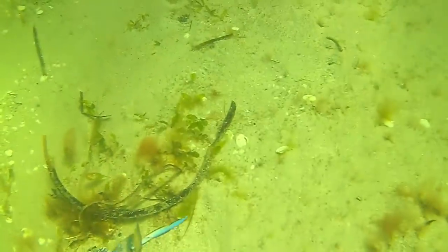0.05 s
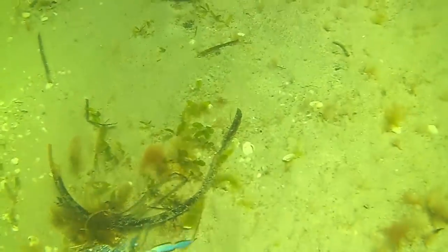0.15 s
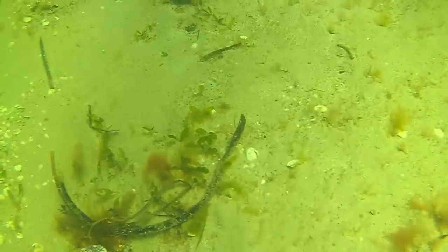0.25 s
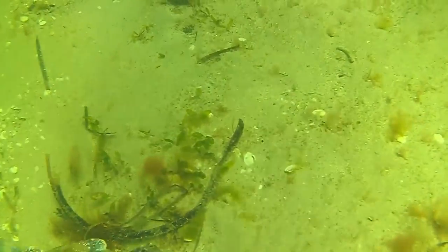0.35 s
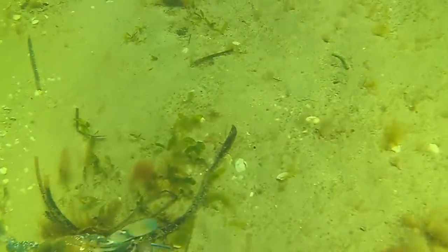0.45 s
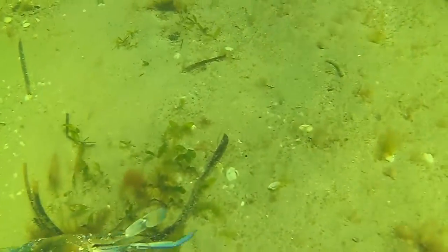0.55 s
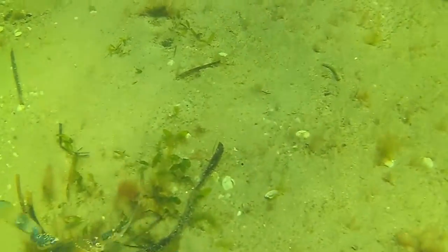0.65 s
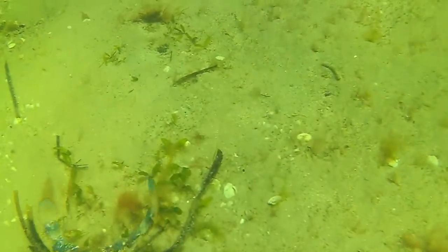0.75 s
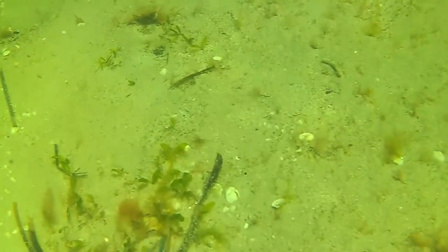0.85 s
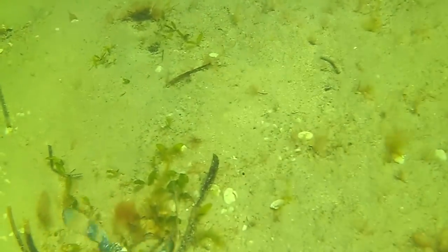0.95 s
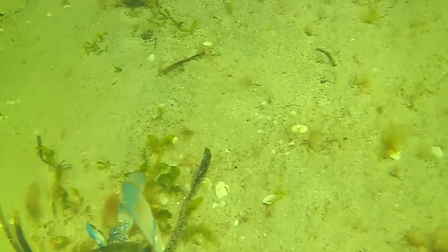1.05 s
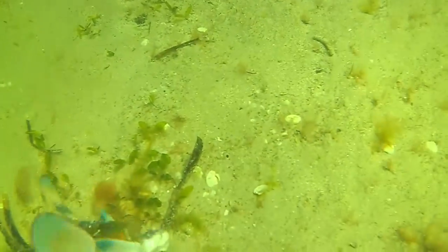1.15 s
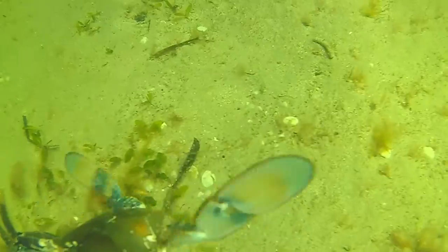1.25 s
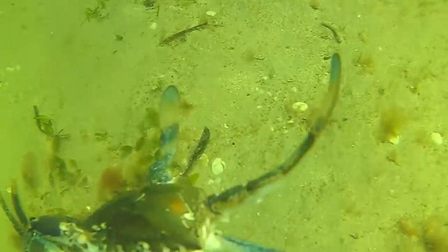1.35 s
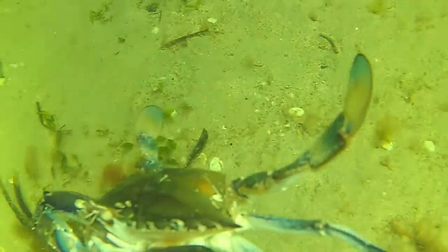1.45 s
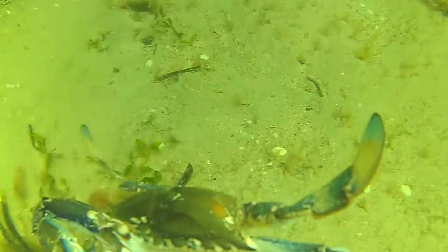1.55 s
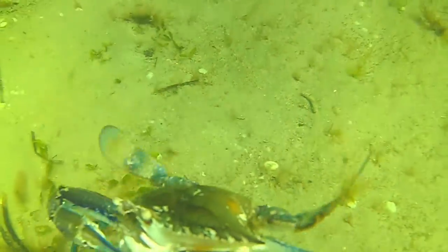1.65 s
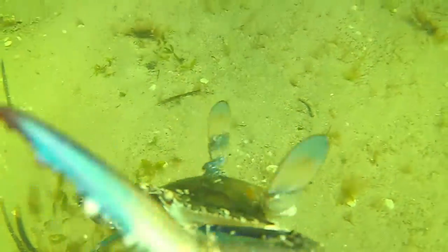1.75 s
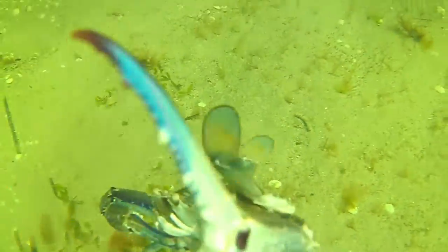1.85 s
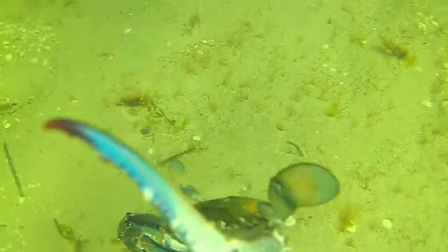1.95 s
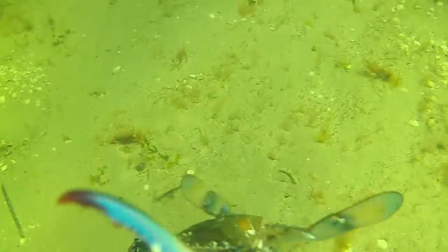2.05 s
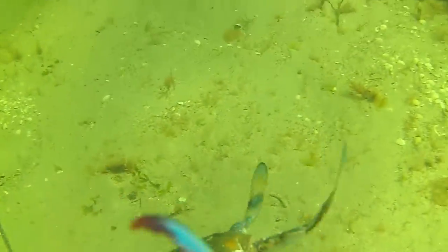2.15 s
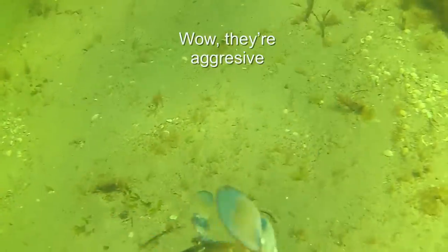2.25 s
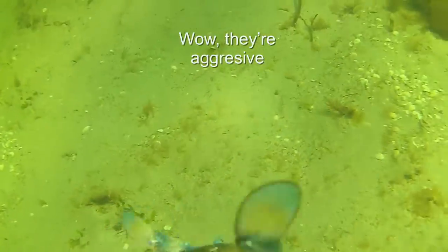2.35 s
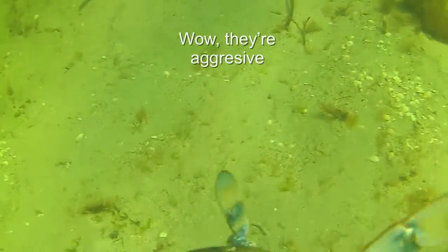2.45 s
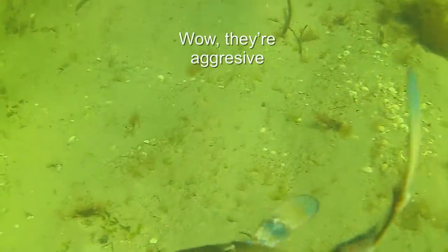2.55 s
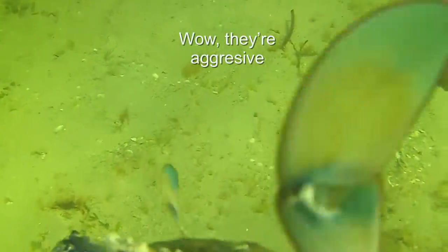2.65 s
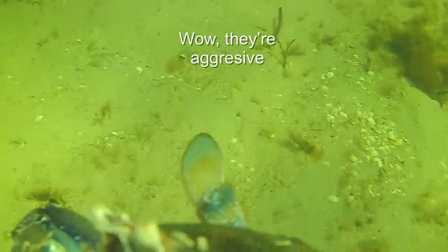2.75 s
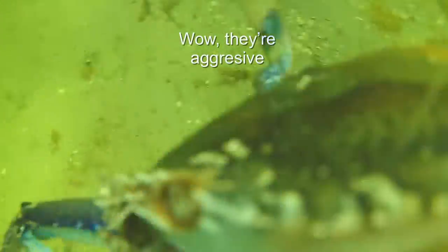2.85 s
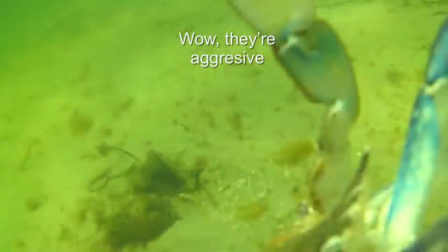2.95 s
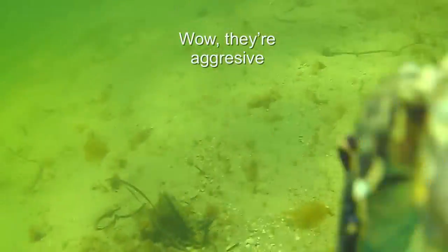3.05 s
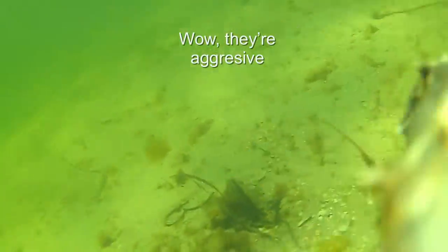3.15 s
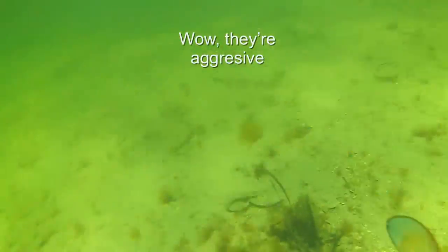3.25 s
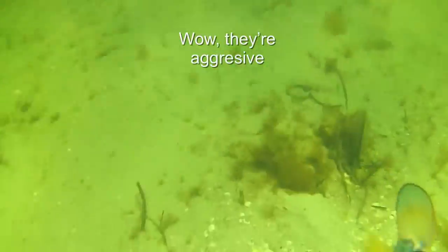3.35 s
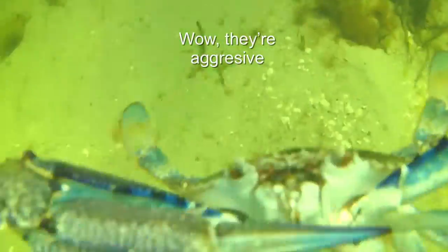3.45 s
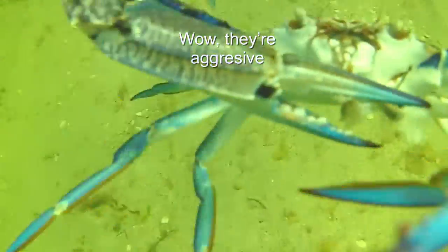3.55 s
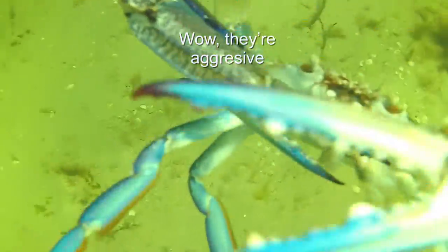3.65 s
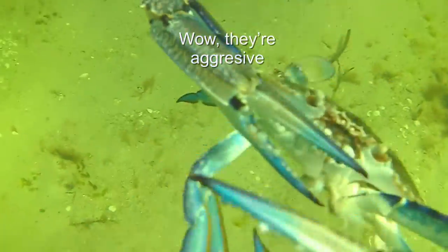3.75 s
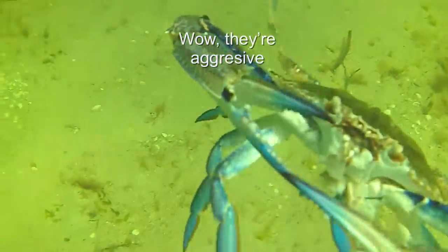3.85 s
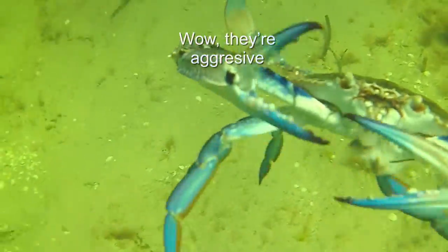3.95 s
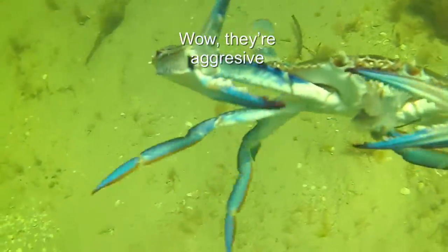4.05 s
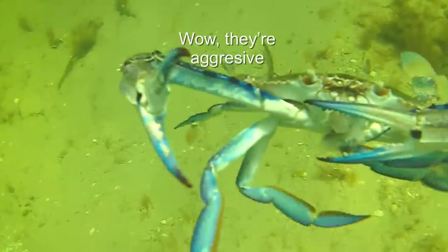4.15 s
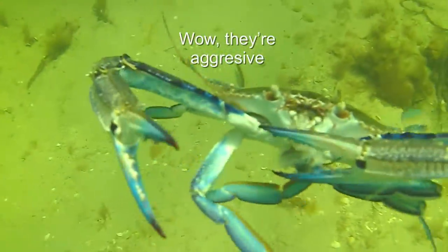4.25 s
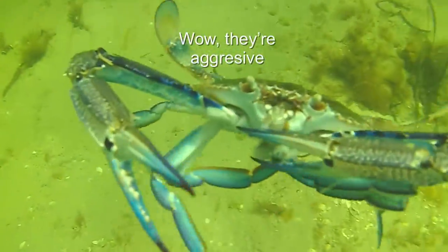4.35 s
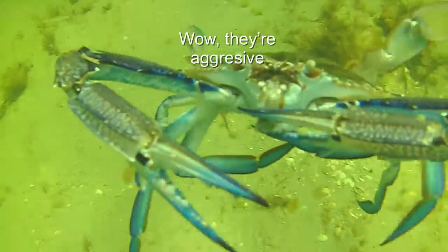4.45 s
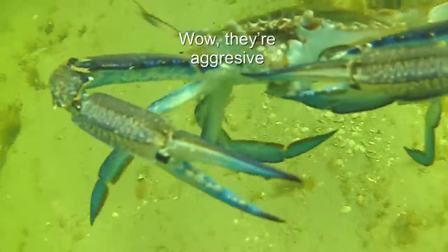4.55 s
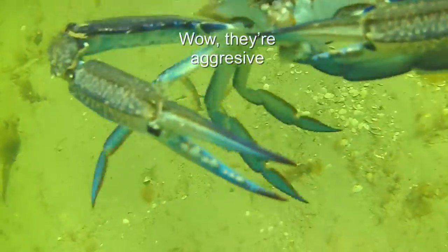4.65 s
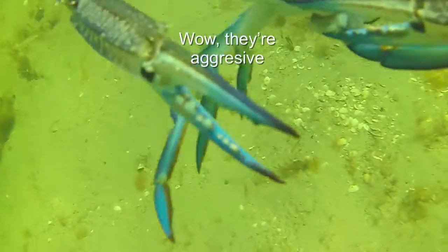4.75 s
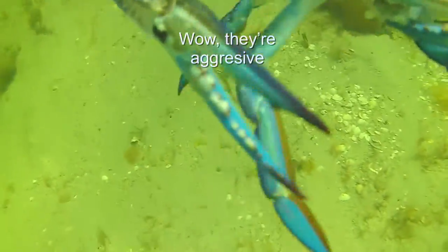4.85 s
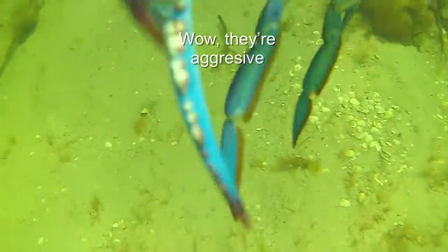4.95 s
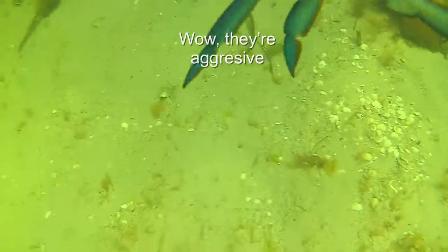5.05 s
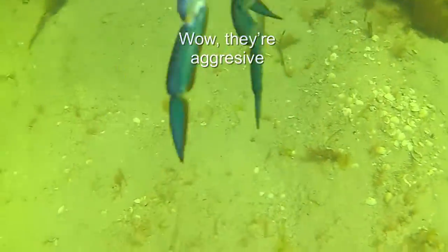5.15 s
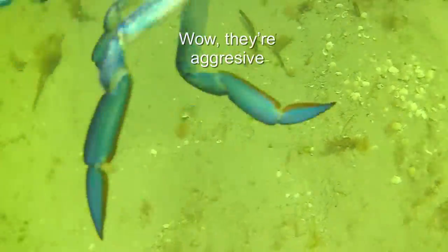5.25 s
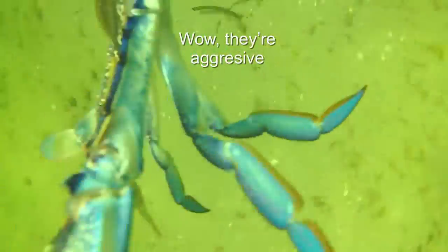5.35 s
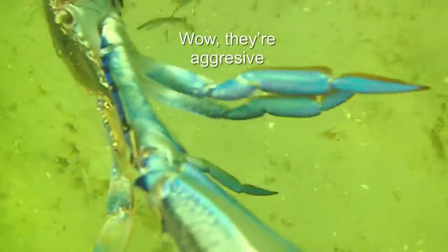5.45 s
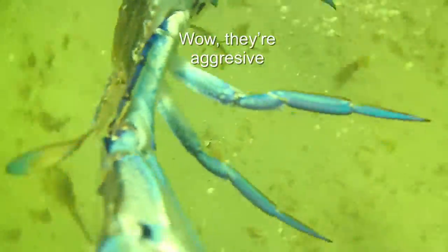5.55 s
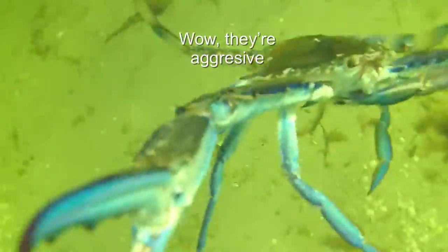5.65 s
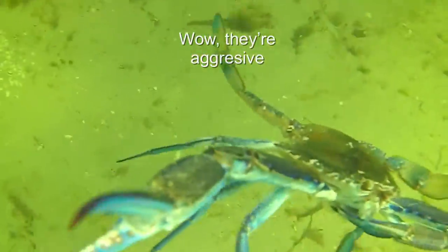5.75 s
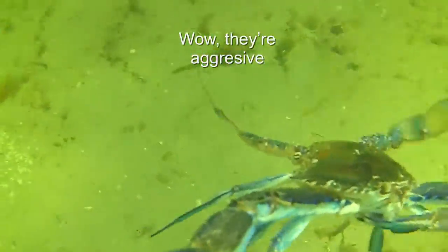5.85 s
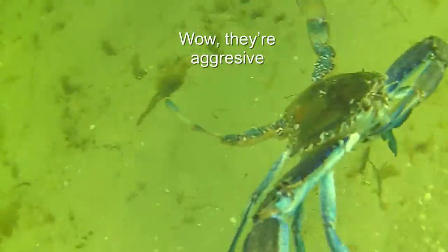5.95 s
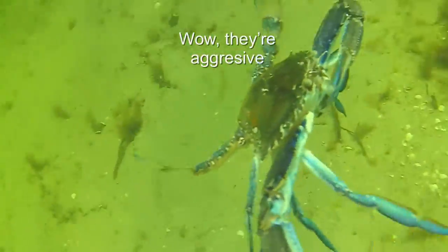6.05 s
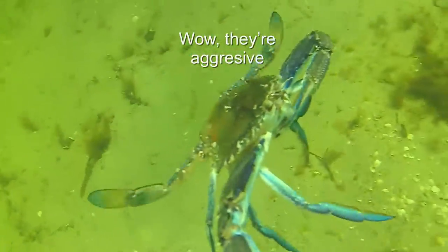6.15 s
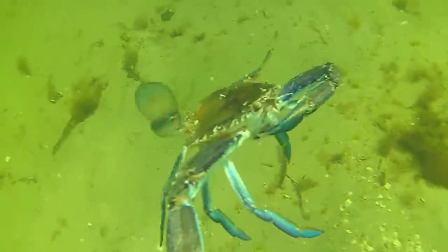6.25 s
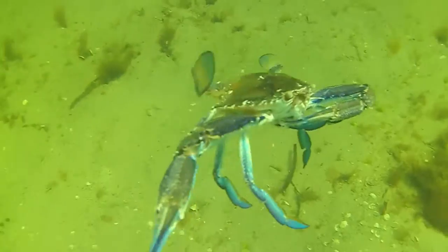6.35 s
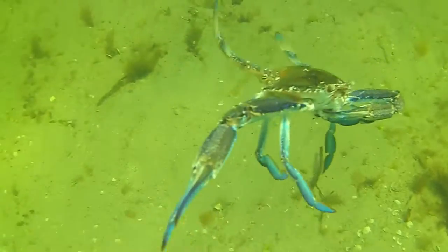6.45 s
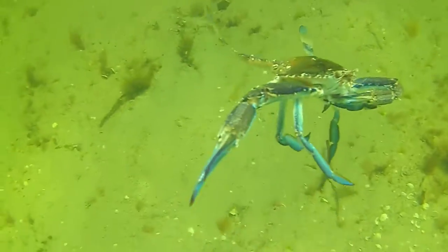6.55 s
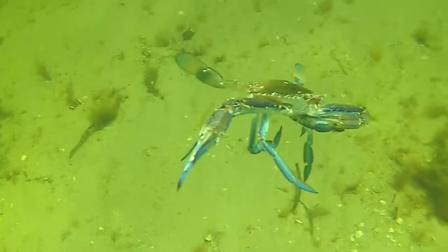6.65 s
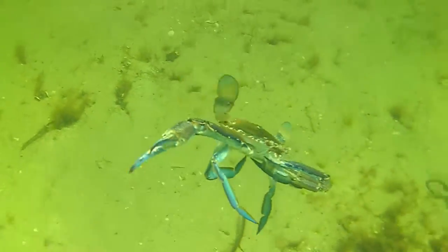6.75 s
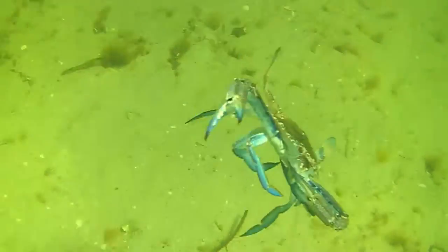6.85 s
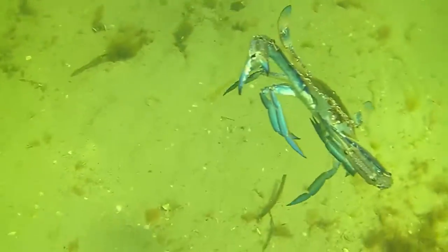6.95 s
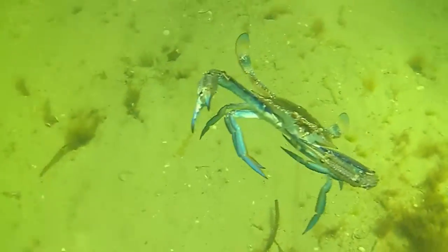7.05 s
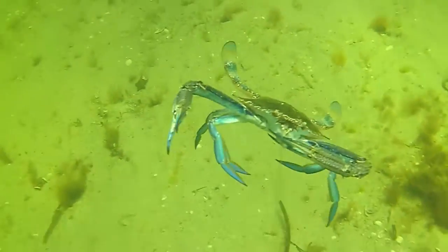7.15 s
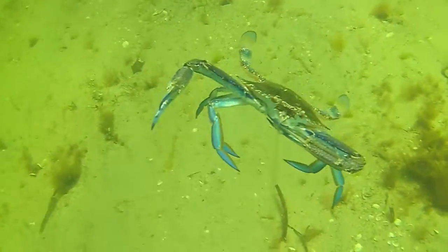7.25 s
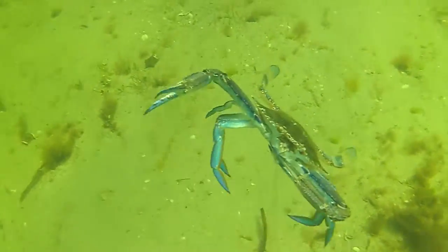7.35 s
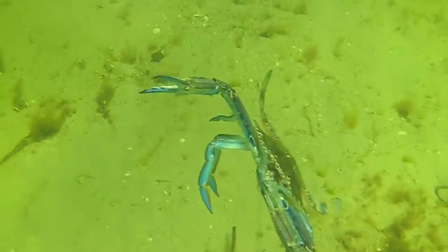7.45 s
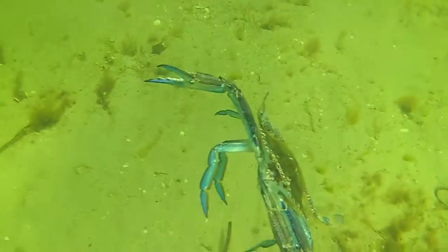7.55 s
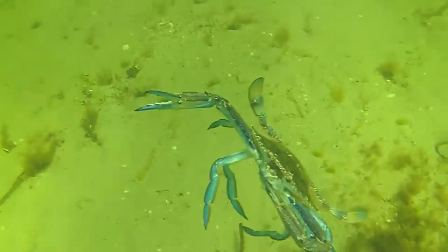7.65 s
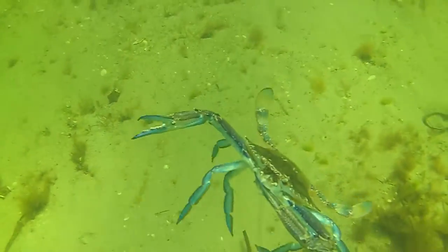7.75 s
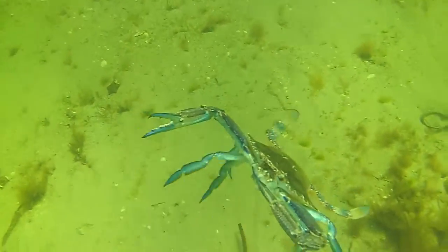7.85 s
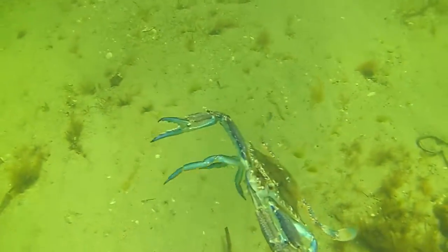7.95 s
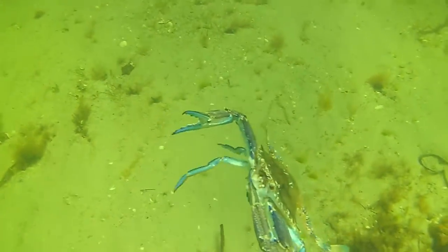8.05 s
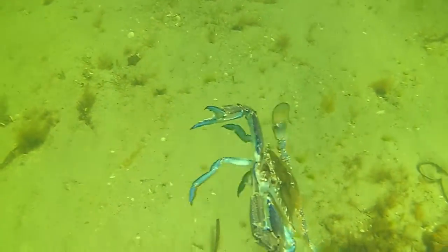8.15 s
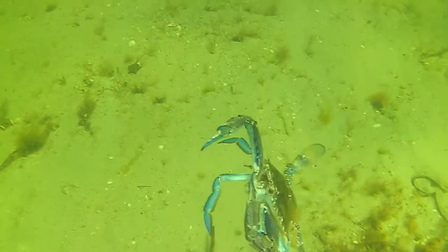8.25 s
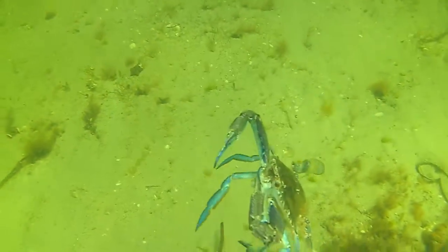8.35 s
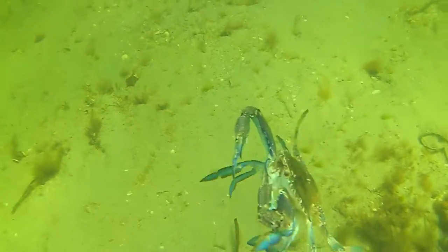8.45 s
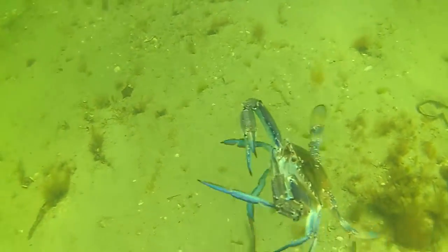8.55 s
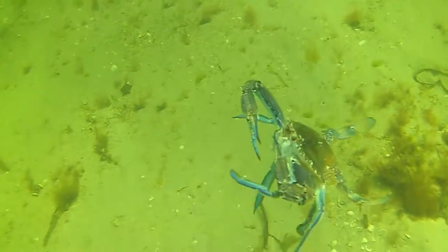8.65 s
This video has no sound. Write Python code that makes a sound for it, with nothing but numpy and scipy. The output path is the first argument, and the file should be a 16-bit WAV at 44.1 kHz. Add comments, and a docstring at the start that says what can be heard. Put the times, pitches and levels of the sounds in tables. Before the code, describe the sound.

A camera in a plastic housing sits just above the seabed, its microphone behind the wall. Steady faint hiss, a low hum and a barely audible thin whine lie under fine, distant shrimp crackle, with a brighter snap at about 0.8 seconds. At 1.1 a sharp claw tap lands, followed by small scratches and soft bumps. Light scraping starts near 2.65, then from 2.75 to 3.15 the crab attacks: very loud, hard knocks, rapid chattering and harsh grinding, with a deep thump as the case is rocked, overloading into crunchy distortion. Quiet returns abruptly. A smaller click comes at 3.5, a strong one at 5.1 with a dull judder, and another at 5.6 among faint scrapes. Light ticks follow around 6.5 to 6.9, a shrimp snap at 7.25, and a final loud tap at 7.8 before the crackle and hiss continue to the end.

```python
"""Distant shrimp crackle through the water over a camera's own hiss, hum and thin whine; then a crab attacks.
The small camera sits in a plastic housing just above the seabed, its microphone behind the housing wall.
Claws and legs tap, knock and scrape at no distance at all: clicks and stick-slip noise ring the shell's modes.
Shoves swing the housing on its mount, as decaying low tones; shrimp are clicks and noise through wall resonances.
The hardest knocks overload the recorder, which briefly lowers its gain and clips what is still too loud."""
import sys
import numpy as np
from scipy import signal
from scipy.fft import rfft, irfft
from scipy.io import wavfile
from scipy.ndimage import uniform_filter1d, minimum_filter1d

SR = 44100
rng = np.random.default_rng(int(sys.argv[2]) if len(sys.argv) > 2 else 0)


def wav_out(sig):
    """Save sig, one row per channel (or a flat mono array), as 16-bit PCM at SR to the path in sys.argv[1]."""
    wavfile.write(sys.argv[1], SR, np.round(np.clip(np.atleast_2d(sig).T, -1, 1) * 32767).astype(np.int16))


N = 383669  # length in samples

# amplifier hiss, relative spectrum: (frequency [Hz], density [dB per Hz])
HISS_SPECTRUM = [(12, -36), (25, -7.5), (65, -5.5), (200, -9), (530, -16.5), (1400, -23.5), (4000, -27),
                 (9000, -30.5), (16400, -41)]
HISS_RMS_DB = -61.5
# partials of the hum: (multiple of HUM_HZ, relative level [dB])
HUM_PARTIALS = [(1, -1), (2, -5), (3, -10), (5, -22), (7, -14.5), (8, -14.5)]
HUM_HZ = 59.94
# course of the hum: (time [s], rms of a partial listed at 0 dB [dB])
HUM_COURSE = [(0, -69.5), (1.5, -72.5), (2, -71), (3.4, -65.5), (6.3, -68), (7.2, -68.5), (8.7, -67)]
# thin high tones from the camera: (frequency [Hz], rms level [dB])
WHINE_TONES = [(15735, -95), (15615, -101)]

# the nearest shrimp snaps, before their random colour: (time [s], peak level [dB])
NEAR_SNAPS = [(0.4185, -41), (0.5892, -41.5), (0.7791, -39), (0.8429, -25), (1.55, -42.5), (1.785, -42),
              (2.3279, -40), (3.297, -39), (3.9549, -32.5), (4.451, -37.5), (4.966, -40.5), (5.897, -36.5),
              (6.229, -36.5), (6.625, -36), (7.1414, -38.5), (7.2497, -25.5), (7.512, -39.5), (7.6066, -39),
              (7.8684, -39.5), (8.001, -38), (8.0654, -36.5)]
# resonances of the wall between water and microphone: (centre [Hz], width of one filter pass [Hz], level [dB])
WALL_BANDS = [(2264, 230, -5.5), (2739.5, 450, -4), (3905, 600, -1), (4486.9, 490, -2.5), (5595, 700, -7),
              (6502.1, 350, -7.5), (8029.8, 610, -6), (8586.3, 600, -9.5), (10048, 800, -14),
              (11455, 900, -16.5), (14135, 4000, -22)]
CRACKLE_PER_S, CRACKLE_RMS_DB, FAR_RMS_DB = 300, -60, -67.5
CRACKLE_SPREAD_DB = 4.5  # scale of the exponential spread in snap size
CRACKLE_COLOUR_DB = 3.5  # each snap reaches the wall with its own colour: deviation per band
ECHO_S, TAIL_S, TAIL_DB = 0.0028, .014, -16  # decay constants of a snap's smear and of its fainter tail

# claws and legs striking the housing: (time [s], peak level [dB], hardness [dB per octave], contact [ms])
TAPS = [(1.12, -13, 1, 2.9443), (1.15, -29, 0, 2.114), (1.194, -33.5, 6, 4.93), (2.755, -5.5, -8.5, 0.6753),
        (2.757, 0, 43.5, 2.526), (2.7743, 3.5, 11.5, 4.368), (2.811, -4.5, -22, 3.809),
        (2.8764, 11, -3, 1.906), (2.967, -21.5, 0.5, 2.41), (3.0147, -5, -11.5, 1.858),
        (3.0174, 9.5, -8.5, 3.387), (3.031, -8, 14, 3.01), (3.078, -22, -10.5, 3.644),
        (3.0921, 7, -8.5, 2.8676), (3.1199, 9.5, -11.5, 2.5), (3.44, -37.5, -1.5, 1.28),
        (3.521, -15.5, 2, 2.579), (3.541, -30, 2, 1.32), (5.109, -5.5, 3.5, 0.5052),
        (5.129, -27.5, 1, 1.536), (5.178, -42.5, 3, 3.27), (5.283, -43, -1, 1.6331),
        (5.34, -34.5, -9.5, 1.1876), (5.368, -37.5, 9, 1.25), (5.518, -40, -5.5, 1.3),
        (5.532, -36, -14.5, 1.104), (5.545, -38, 12, 2.4), (5.59, -14, 1.5, 1.31),
        (5.6163, -37, 16, 1.0031), (6.519, -37.0, 1, 1.4184), (6.755, -33, 5, 2.034),
        (6.859, -34.5, -2, 1.37), (6.8705, -21.0, 4.5, 0.963), (7.778, -6, 4, 1.3258),
        (7.81, -25, 3.5, 1.1345)]
# a claw chattering to rest:
# (start [s], length [s], peak at start [dB], peak at end [dB], hardness [dB per octave])
CHATTERS = [(2.787, 0.015032, -9, -11, 12.5), (2.885, .068, 2, -22, 8), (3.043, .016, -17, -19.5, 1.5),
            (5.139, .016, -34.5, -40.5, -5.5)]
CHATTER_GAP_S, CHATTER_CONTACT_MS = .009, 2.9  # mean gap between ticks
# every tap bounces once, softer, then the claw slides off; levels are relative to the tap
REBOUND_S, REBOUND_DB, REBOUND_SOFTER_DB = .0065, -16, -4
SLIDE_S, SLIDE_DB, SLIDE_FADE_DB, SLIDE_HARDNESS_DB = 0.084, -30, -28, -8.5
SLIDE_TOP_DB = -42  # a slide starts no louder than this
# short notes, most of them just after a tap: (time [s], level before onset and decay [dB])
NOTES = [(1.125, -43.5), (3.528, -44), (5.114, -39.5), (5.15, -43.5), (5.596, -44), (6.52, -52),
         (6.872, -47), (7.005, -52)]
NOTE_HZ, NOTE_T60_S = 937.32, 0.06435

# modes of the plastic shell, before damping and spot: (frequency [Hz], relative level [dB], t60 [s])
SHELL_MODES = [(383.3, -21, .06), (970.52, -20.5, .09), (1256.2, -14.5, 0.037), (1668.7, -9.5, 0.032),
               (1943.4, -10, 0.03), (2161.8, -9.5, .04), (2840.1, -6, 0.034), (3328.1, -8.5, .025),
               (3618, -2.5, .035), (4081.9, 0.5, .025), (4504, -8, 0.009), (5121.5, -5.5, 0.012),
               (5590, -4.5, .03), (6435, -17, .025), (6755.6, -15.5, 0.024), (7880, -6.5, 0.02),
               (8925, -19, .015), (9990, -8, 0.016), (11300, -25, .01), (13471, -21, .008),
               (15246, -25.5, .008)]
WET_CYCLES, FREE_DB = 5.5, -14  # water and claw damp the first swings fast; this share rings on
# sand and countless small modes crunch on after each click:
# level relative to the modes (hardness 0 or more), decay constant, upper band edge
GRIT_DB, GRIT_S, GRIT_HZ = -9, .0028, 7115

# claws dragged over the housing, levels relative:
# (start [s], end [s], level at start [dB], level at end [dB], hardness [dB per octave])
SCRAPES = [(1.168, 1.346, -60, -55, -1.5), (2.643, 2.758, -53, -57, -0.5), (2.757, 2.833, -21, -31.5, -1),
           (2.826, 2.888, -13.5, -13.5, 1), (2.873, 2.952, -17, -32, -0.5), (2.966, 3.011, -37, -54, -2),
           (3.068, 3.093, -42.5, -31.5, -15), (3.095, 3.112, -10, -12, -16),
           (3.109, 3.121, -1.5, -2.5, -17), (3.117, 3.165, -16.5, -19, -5.5),
           (3.439, 3.506, -50.5, -54.5, -1.5), (5.177, 5.362, -62.5, -66, -14.5),
           (5.494, 5.582, -51, -58.5, -1), (5.5, 5.7, -67.5, -68.5, 19), (5.656, 5.778, -58, -56.5, -4),
           (6.725, 6.827, -48.5, -52, 1), (7.0, 7.05, -58.5, -62, -5), (7.5, 7.76, -58, -54.5, -1.5)]

# shoves that rock the whole camera, levels before the push smooths them:
# (time [s], thump [dB], ring [dB], knock [dB], push [ms])
SHOVES = [(1.229, -39, -50.5, -42.5, 1.7), (1.249, -39.5, -52.5, -49.5, 0.69), (1.317, -46, -44.5, -57, 2),
          (2.7545, 0, -28, -3, 0.85), (2.811, -26.5, -42.5, -10.5, 0.76), (2.859, -31.5, -36.5, -11.5, 1.2),
          (2.8773, -22.5, -36, 9, .6), (3.0207, -19.5, -25, -3, 1), (3.033, -22.5, -38, -10.5, 1),
          (3.0942, -22.5, -37, -15, 1), (3.117, -33, -44.5, -22, 1.1), (3.42, -49, -64.5, -57.5, 56),
          (5.16, -38.5, -44.5, -35, 137), (5.458, -57.5, -49.5, -47, 110), (5.523, -59, -70.5, -34, 36),
          (5.67, -50, -45.5, -41, 130)]
# swings of the mount, rows thump, ring, sway, knock: (frequency [Hz], t60 [s])
MOUNT_MODES = [(135, 0.057), (140, 0.6), (240, 0.018), (446, 0.024)]
SWAY_DB = -3  # the sway follows the thump, this far below it

DUCK_DB, DUCK_HOLD_S, DUCK_ABOVE = -2.5, 0.18, 0.68  # gain step, hold, and the peak that triggers it
TOP_HZ = 15950  # the recorder's upper limit


def undb(db):
    """Decibels to an amplitude factor."""
    return 10 ** (np.asarray(db) / 20)


def level(x, db):
    """Scale a sound to an rms level in dB."""
    return x * undb(db) / np.sqrt(np.mean(x ** 2))


def add(track, sound, s):
    """Mix a sound into the track from time s."""
    i = int(s * SR)
    track[i:i + len(sound)] += sound[:len(track) - i]


def ring(hz, t60, seconds):
    """Free decay of one mode, or of a column of modes."""
    t = np.arange(int(seconds * SR)) / SR
    return np.sin(2 * np.pi * hz * t) * np.exp(-np.log(1000) * t / t60)


def burst(noise, shape):
    """Noise under an envelope, with an even spectrum: a click smeared in time but not coloured."""
    for _ in range(3):  # flatten the spectrum and restore the envelope in turn
        tones = rfft(noise * shape)
        noise = irfft(tones / np.abs(tones), len(noise)) / np.sqrt(shape + 1e-3)
    return noise * shape


def camera():
    """Amplifier hiss as shaped noise, a hum at the frame rate and a thin whine, both sums of sines."""
    t = np.arange(N) / SR
    f = np.arange(N // 2 + 1) * SR / N + 1  # 1 Hz up, so the logarithm exists
    hz, db = np.transpose(HISS_SPECTRUM)
    spectrum = undb(np.interp(np.log(f), np.log(hz), db))
    hiss = irfft(rfft(rng.standard_normal(N)) * spectrum, N)
    hum = sum(undb(d) * np.sin(2 * np.pi * (k * HUM_HZ * t + rng.random())) for k, d in HUM_PARTIALS)
    hum = hum * undb(np.interp(t, *np.transpose(HUM_COURSE)))
    whine = sum(undb(d) * np.sin(2 * np.pi * w * t) for w, d in WHINE_TONES)
    return level(hiss, HISS_RMS_DB) + np.sqrt(2) * (hum + whine)  # sqrt 2: rms to sine peak


def shrimp():
    """Near snaps, a random crackle and the blur of far ones, all coloured by the housing wall."""
    count = int(CRACKLE_PER_S * N / SR)
    places = rng.integers(0, N, count)
    sizes = undb(CRACKLE_SPREAD_DB * np.minimum(rng.exponential(size=count), 3))
    t = np.arange(1600) / SR
    fade = np.exp(-t / ECHO_S) + undb(TAIL_DB) * np.exp(-t / TAIL_S)
    echo = burst(rng.standard_normal(len(t)), fade)  # sand and surface smear every snap
    near, crackle, far = 0, 0, 0
    at, near_db = np.transpose(NEAR_SNAPS)
    for hz, width, db in WALL_BANDS:
        b, a = (np.convolve(c, c) for c in signal.iirpeak(hz, hz / width, SR))  # twice: steep flanks
        clicks = np.zeros((2, N))
        clicks[0, (at * SR).astype(int)] = undb(near_db + 2.5 * rng.standard_normal(len(at)))
        colour = undb(CRACKLE_COLOUR_DB * rng.standard_normal(count))
        clicks[1, places] = sizes * colour * rng.choice([-1, 1], size=count)
        sources = np.vstack([clicks, rng.standard_normal(N)])
        near_band, crackle_band, far_band = undb(db) * signal.lfilter(b, a, sources)
        near, crackle, far = near + near_band, crackle + crackle_band, far + far_band
    near, crackle = signal.fftconvolve([near, crackle], echo[None], axes=1)[:, :N]
    near = near * undb(near_db.max()) / np.abs(near).max()
    return near + level(crackle, CRACKLE_RMS_DB) + level(far, FAR_RMS_DB)


def shell(hardness_db, spot):
    """The shell's answer to a click; each spot wakes the modes a little differently."""
    hz, db, t60 = np.array(SHELL_MODES).T[:, :, None]
    spot_level, spot_pitch = spot[0][:, None], spot[1][:, None]
    # the contact favours modes about an octave above (hard) or below (soft) the middle
    slope_db = hardness_db * np.log2(hz / 3500)
    tilt_db = np.minimum(slope_db, (3 * abs(hardness_db) - slope_db) / 2)
    gain = undb(db + tilt_db + 2.5 * spot_level)
    gain[::2] *= -1  # neighbouring modes swing against each other
    t = np.arange(int(.08 * SR)) / SR
    damping = np.exp(-t * hz / WET_CYCLES) + undb(FREE_DB)
    t60 = np.clip(t60, .005, 120 / hz)  # plastic never rings past about 120 cycles
    modes = np.sum(gain * damping * ring(hz * (1 + .01 * spot_pitch), t60, .08), axis=0)
    grit_band = signal.butter(1, [1500, GRIT_HZ], "band", fs=SR)
    grit = signal.lfilter(*grit_band, rng.standard_normal(len(t))) * np.exp(-t / GRIT_S)
    grit_gain = undb(GRIT_DB + 0.55 * min(hardness_db, 0))  # soft contacts crunch less
    modes += grit * grit_gain * np.sqrt(np.sum(modes ** 2) / np.sum(grit ** 2))
    return signal.sosfilt(signal.butter(2, 300, "high", fs=SR, output="sos"), modes)


def strikes():
    """All contacts: taps, their rebounds, and chatters of unevenly spaced, fading ticks."""
    rebounds = [(s + REBOUND_S, db + REBOUND_DB, hardness_db + REBOUND_SOFTER_DB, ms)
                for s, db, hardness_db, ms in TAPS]
    rows = TAPS + rebounds
    for start, length, db0, db1, hardness_db in CHATTERS:
        times = np.cumsum(CHATTER_GAP_S * (.5 + rng.random(20))) - CHATTER_GAP_S / 2
        for s in times[times < length]:
            rows.append((start + s, db0 + (db1 - db0) * s / length, hardness_db, CHATTER_CONTACT_MS))
    return rows


def taps():
    """A click smeared over the contact rings the shell; short decaying notes are added."""
    out, t, rows = np.zeros(N), np.arange(600) / SR, strikes()
    spots = rng.standard_normal((100, 2, len(SHELL_MODES)))
    rattles = rng.standard_normal((100, 600))
    for (s, db, hardness_db, ms), spot, rattle in zip(rows, spots, rattles):
        u = 3 * t / (max(ms, .2) / 1000)  # pressure peaks a third of the way through the contact
        click = burst(rattle, u * np.exp(1 - u))
        tap = signal.fftconvolve(click, shell(hardness_db, spot))
        add(out, tap * undb(db) / np.abs(tap).max(), s)
    onset = np.minimum(np.arange(SR // 10) / (.006 * SR), 1)
    for s, db in NOTES:
        add(out, undb(db) * ring(NOTE_HZ, NOTE_T60_S, .1) * onset, s)
    return out


def scrapes():
    """Stick-slip: dense uneven clicks into the same shell modes, for drags and for slides after taps."""
    slides = []
    for s, tap_db, _, _ in TAPS:
        db = min(tap_db + SLIDE_DB, SLIDE_TOP_DB)
        slides.append((s, s + SLIDE_S, db, db + SLIDE_FADE_DB, SLIDE_HARDNESS_DB))
    out = np.zeros(N)
    for start, end, db0, db1, hardness_db in SCRAPES + slides:
        count = int((end - start) * SR)
        slips, wobble = rng.standard_normal((2, N // 20))[:, :count]
        grip_db = 30 * uniform_filter1d(wobble, size=150)  # wanders by about 2.5 dB
        drag = slips * np.sqrt(np.abs(slips)) * undb(grip_db + np.linspace(db0, db1, count))
        answer = shell(hardness_db, rng.standard_normal((2, len(SHELL_MODES))))
        add(out, signal.fftconvolve(drag / 2, answer / np.sqrt(np.sum(answer ** 2))), start)
    return out


def shoves():
    """A short push sets the camera swinging on its mount; a long one judders as it slides."""
    out = np.zeros(N)
    for s, thump_db, ring_db, knock_db, ms in SHOVES:
        dbs = thump_db, ring_db, thump_db + SWAY_DB, knock_db
        push = np.hanning(int(max(ms, .2) * SR / 1000) + 2)
        judder = rng.standard_normal(N // 20)[:len(push)] * push
        push = push / push.sum() if ms < 10 else judder / np.sqrt(np.sum(judder ** 2))
        swing = sum(undb(db) * ring(hz, t60, 1) for db, (hz, t60) in zip(dbs, MOUNT_MODES))
        add(out, signal.fftconvolve(push, swing), s)
    return signal.sosfilt(signal.butter(1, 60, "high", fs=SR, output="sos"), out)


def scene():
    """Everything that reaches the recorder, on one channel."""
    return (taps() + scrapes() + shoves() + shrimp() + camera())[None]


def record(dry):
    """After each peak over DUCK_ABOVE the gain steps down and holds; the result clips, then the top is cut."""
    hold = int(DUCK_HOLD_S * SR)
    recent = -minimum_filter1d(-np.abs(dry), hold, origin=(hold - 1) // 2)  # highest peak within the hold
    step = undb(DUCK_DB * (recent > DUCK_ABOVE)) - 1
    gain = signal.lfilter([.004], [1, -.996], step) + 1  # eases in and out over some milliseconds
    wet = np.clip(dry * gain, -.93, .93)
    return signal.sosfilt(signal.ellip(10, .2, 90, TOP_HZ, fs=SR, output="sos"), wet)


dry = scene()
out = record(dry)
wav_out(out)
```